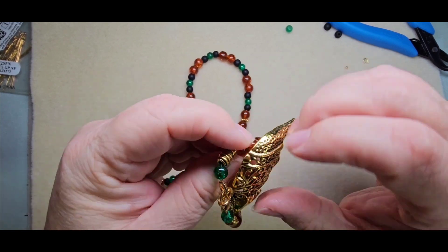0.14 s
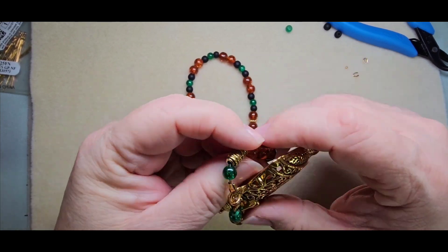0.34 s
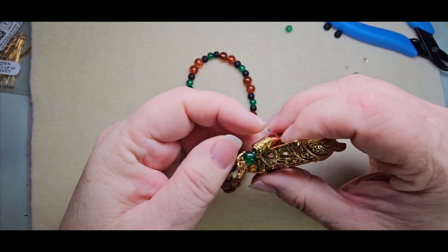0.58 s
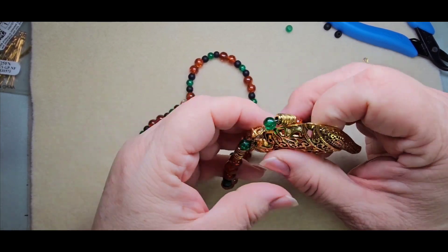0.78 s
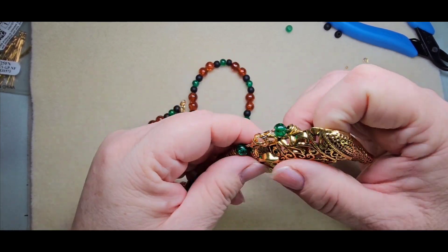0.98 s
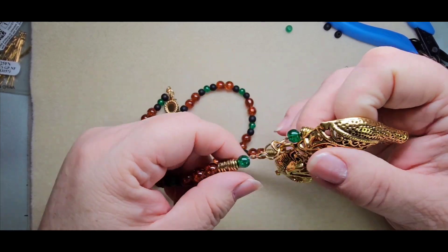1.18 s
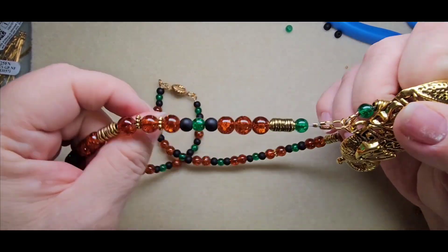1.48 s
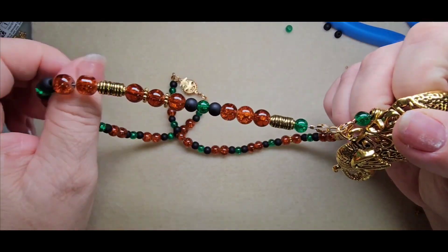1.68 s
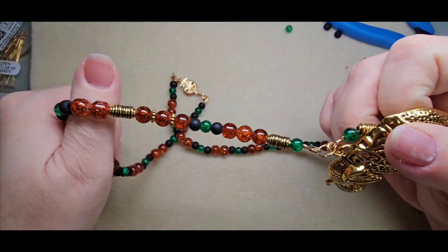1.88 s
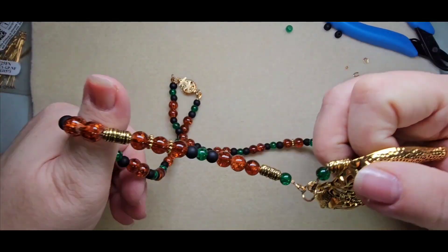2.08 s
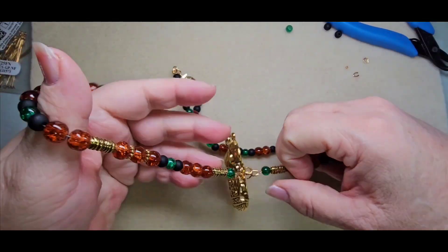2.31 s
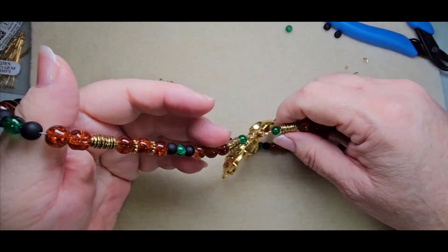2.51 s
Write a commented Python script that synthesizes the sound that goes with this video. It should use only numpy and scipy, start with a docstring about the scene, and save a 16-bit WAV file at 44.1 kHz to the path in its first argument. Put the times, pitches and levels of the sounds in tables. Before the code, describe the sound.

Beaded necklace with a filigree metal pendant clinks and rattles in handling, then drops with a thud

```python
"""Strung necklace handled over a craft table

A filigree metal pendant clinks (noise cracks and decaying modes); short clacks and light ticks, of beads or pendant
(noise bursts, brief random pitches); a small link tinkles (two high modes); at last the pendant drops and the table
thuds (modes). Behind: random faint ticks, one soft rub, a low hum and a thin hiss (shaped noise)."""
import sys
import numpy as np
from scipy import signal
from scipy.fft import rfft, irfft
from scipy.io import wavfile

SR = 44100
rng = np.random.default_rng(int(sys.argv[2]) if len(sys.argv) > 2 else 0)


def store_pcm(level_fs):
    """Save levels as 16-bit WAV."""
    pcm = np.round(np.clip(level_fs, -1, 1) * 32767).astype(np.int16)
    wavfile.write(sys.argv[1], SR, np.atleast_2d(pcm).T)


N = 116865

# room hum spectrum: freq_hz, density_db (relative, per Hz)
HUM_SPECTRUM = [(30, -28.5), (54, -4), (91, -8.5), (124, 4), (161, -10.5), (255, -13.5), (298, -27),
                (360, -28), (420, -13), (490, -24), (516, -19.5), (601, -30), (690, -23), (819, -35),
                (1800, -42.5), (2400, -57.5)]
# hum width: freq_hz, side_over_mid_db
HUM_WIDTH = [(60, -18), (130, -19.5), (250, -4.5), (1400, -1.5)]
# hiss spectrum: freq_hz, density_db (relative, per Hz)
HISS_SPECTRUM = [(1200, 14), (2000, 6), (7000, -2.5), (16500, -7)]
# lowest level of the random faint ticks over time: time_s, lowest_db
RUSTLE_LOWEST = [(0, -72), (.3, -68), (.8, -71.5), (1.26, -76.5), (1.45, -55), (1.8, -76), (1.87, -81.5),
                 (2.15, -72.5), (2.22, -98.5), (2.37, -74), (2.45, -64.5), (2.65, -64)]
# table-top modes: freq_hz, level_db, t60_s
TABLE_MODES = [(101, 0, 0.095), (188.3, 4, 0.091)]
# small link strikes: start_s, level_db
TINKLES = [(2.1403, -36.5), (2.146, -33), (2.1523, -29.5), (2.1695, -44)]
# small link modes: freq_hz, level_db, t60_s
LINK_MODES = [(14780, -16, .02), (15350, -24, .015)]
# short clacks and light ticks, of beads or pendant: start_s, level_db (relative), treble_over_middle_db
CLACKS = [(0.0632, -46, -3), (0.084, -46, 1.5), (0.159, -53.5, 2), (0.202, -45.5, 6), (0.419, -48.5, 0),
          (0.569, -41.5, 8.5), (0.586, -51, 5), (0.6368, -42.5, 6), (0.804, -46, -4), (0.868, -42.5, 7),
          (0.927, -46.5, 0), (1.003, -50.5, -0.5), (1.0217, -51.5, -2), (1.0953, -38.5, 6),
          (1.1406, -34, 9), (1.159, -47.5, -3), (1.198, -41, 2.5), (1.209, -40, -0.5), (1.3046, -35, 5),
          (1.318, -34, 2), (1.3495, -36.5, 3), (1.368, -44, -6.5), (1.3798, -24.5, 6), (1.3843, -22, 18),
          (1.4125, -40, -3), (1.4265, -42.5, 1), (1.47, -40.5, 0), (1.4928, -39.5, -2), (1.501, -40.5, -4),
          (1.5167, -44, 0), (1.5374, -35, 2.5), (1.572, -32, 6), (1.577, -26, 10.5), (1.5892, -29.5, 8.5),
          (1.6173, -31, 7), (1.6262, -34, 4), (1.639, -32, 12), (1.6475, -35, 5), (1.6631, -26.5, 8),
          (1.6814, -30.5, 4), (1.6981, -28, 9.5), (1.7085, -29.5, 8), (1.73, -38, 2), (1.7406, -33, 8),
          (1.752, -37, 2.5), (1.766, -34, 7.5), (1.784, -36, 5.5), (1.8086, -44, 4.5), (1.8295, -50, 4),
          (1.892, -44, 11.5), (1.915, -43, 8.5), (1.9303, -50, 4), (1.9823, -50, 8.5), (2.0553, -39, 10.5),
          (2.1187, -45.5, 11), (2.272, -63, -3), (2.311, -64, 6), (2.434, -43.5, 5), (2.4758, -57.5, -3.5),
          (2.561, -27, 18), (2.5715, -32, 9), (2.5837, -32.5, 9), (2.594, -31.5, 11), (2.61, -36, 22)]
# clack noise bands, middle then treble: low_hz, high_hz
CLACK_BANDS = [(3000, 9640), (10500, 20000)]
# pendant knocks: start_s, low_db, middle_db, high_db, ring_over_crack_db (relative)
KNOCKS = [(0.1103, -35, -29.5, -35, -2.5), (0.2291, -38.5, -34, -41, 2), (0.2499, -34, -34, -35.5, 2),
          (0.2621, -36.5, -44, -41, -1), (0.2924, -25, -29, -30.5, 4.5), (0.305, -33.5, -36, -35, -1.5),
          (0.3358, -34.5, -35, -36, -10), (0.3562, -28.5, -31.5, -34, 3), (0.429, -36.5, -39, -37.5, 0),
          (0.4347, -40, -46, -48, -2), (0.4648, -26.5, -36, -32.5, 5), (0.5776, -40, -34, -48, -1.5),
          (0.6542, -41, -38.5, -41, -2.5), (0.728, -27.5, -26.5, -20.5, -10.5),
          (0.7698, -27, -33.5, -27, -5.5), (0.779, -39, -48, -32, -9), (0.82, -30, -28.5, -19, -5),
          (0.8563, -39, -43, -57, -5.5), (1.0501, -32.5, -29, -28.5, -2.5),
          (2.3821, -41.5, -46.5, -38.5, -1), (2.4005, -39.5, -48, -33, 0.5), (2.407, -38, -47, -32, 1),
          (2.426, -48.5, -44, -46.5, 0), (2.5273, -25.5, -25.5, -17, -6)]
# pendant modes in low, middle, high groups: freq_hz, held_db (relative), base_t60_s, dropped_db (relative)
PENDANT_MODES = [
    [(4250, -14, .04, -14), (4730, -14, .04, -18), (5290, 2, .05, -20), (5490, -10, .04, -18),
     (6735, -4, .055, -13)],
    [(8330, 0, .04, -26), (8640, -6, .04, -22), (10245, -8, .04, -10)],
    [(11555, 0, .045, 0), (11850, -8, .04, -10), (14130, -1, .035, -22), (14500, -13, .035, -16),
     (15600, -10, .03, -17)],
]
# crack noise band of each pendant group: low_hz, high_hz
PENDANT_BANDS = [(4200, 7400), (7400, 10800), (10800, 16500)]
# left minus right of each pendant group: pan_db
PENDANT_PAN_DB = [3.5, 6, 4]

HUM_RMS_DB, HISS_RMS_DB = -52, -81.5
PAN_DB = 3  # left minus right, for clacks, link and rustle
LAG_S, ALIKE = 0.000251, 0.21  # right port: delay and share of the left port's noise
RING_PHASE_RAD = 1.395  # between ports
ROLL_HZ, TOP_HZ = 15900, 16990
# contact outline
RISE_S, KNOCK_T60_S, CLACK_T60_S = 0.0013, 0.0074, 0.0069
TAIL_T60_S, TAIL_DB = 0.14, -16.5  # faint tail of table and room
LEAD_IN_MEAN_S, LEAD_IN_DB = 0.004, -23.5
BOUNCE_MEAN_S, BOUNCE_MAX_DB = 0.0054, -4.5
# background handling
TICKS_PER_S, TICK_MEAN_EXCESS_DB = 260, 2.5
RUB_S, RUB_SIGMA_S, RUB_HZ, RUB_PEAK_RMS_DB = 1.787, 0.065, 1690, -72.5
THUD_S, THUD_DB = 2.526, -34
# clacks
CLACKS_DB, CLACK_TREBLE_DB, CLACK_TREBLE_PAN_DB = -7.5, 0.5, 2
SNAP_DB = 1.5  # hard first tick
CLACK_RING_DB, CLACK_RING_T60_S = -17.5, 0.012
# pendant
RING_DB, CRACK_DB, MODE_SCATTER_DB = -12, -10, 3.5
CHATTER_GAIN = 0.17741
JINGLE_DB = -25  # loose parts: faint tail of the chatter
HELD_T60_RATIO, FREE_T60_RATIO, LINGER_DB = 0.38, 1.43, -19
BODY_DB, BODY_LOW_HZ, THIN_HZ = -25.5, 1670, 3680
DROP_DB, DROP_RATTLE_T60_S = -43.5, 0.028


def undb(db):
    """dB to amplitude."""
    return 10 ** (np.asarray(db, float) / 20)


def pan(db):
    """Gains of the left and right ports, left minus right in dB."""
    return undb([[db / 2], [-db / 2]])


def strikes(times_s, db):
    """Impulses of the given levels."""
    x = np.zeros(N)
    index = (np.asarray(times_s) * SR).astype(int)
    np.add.at(x, np.clip(index, 0, N - 1), undb(db))
    return x


def cluster(times_s, db, chance):
    """A contact is a faint lead-in, a blow and a rebound."""
    lead_in = strikes(times_s - LEAD_IN_MEAN_S * (.5 + chance[:, 0]), db + LEAD_IN_DB)
    blow = strikes(times_s, db)
    rebound = strikes(times_s + BOUNCE_MEAN_S * (.5 + chance[:, 1]), db + BOUNCE_MAX_DB - 5 * chance[:, 2])
    return lead_in + blow + rebound


def fade(x, t60_s):
    """Exponential decay after each impulse."""
    return signal.lfilter([1], [1, -np.exp(-np.log(1000) / (t60_s * SR))], x)


def burst(x, t60_s, tail_db=TAIL_DB):
    """Amplitude outline of contacts: rounded swell and fall, faint tail; powers add."""
    power_in = x ** 2
    swell = fade(fade(power_in, t60_s / 2), t60_s / 2) * 37.6 / (t60_s * SR)  # peak 1 per unit strike
    tail = undb(2 * tail_db) * fade(power_in, TAIL_T60_S / 2)
    k = np.exp(-1 / (RISE_S * SR))
    smooth = signal.lfilter([1 - k], [1, -k], swell + tail)
    return np.sqrt(np.maximum(smooth, 0))


def band(x, low_hz, high_hz, order=3):
    """Butterworth band-pass."""
    return signal.sosfilt(signal.butter(order, [low_hz, high_hz], "band", fs=SR, output="sos"), x)


def pair(low_hz, high_hz, order=3):
    """Band noise of rms 1 at two ports; the right shares a delayed part of the left."""
    left, other = rng.standard_normal((2, N))
    right = ALIKE * np.roll(left, int(LAG_S * SR)) + np.sqrt(1 - ALIKE ** 2) * other
    x = band(np.array([left, right]), low_hz, high_hz, order)
    return x / x.std()


def ring(x, hz, db, t60_s):
    """One decaying mode as a complex resonator; the ports hear it out of phase."""
    pole = np.exp((2j * np.pi * hz - np.log(1000) / t60_s) / SR)
    z = signal.lfilter([1], [1, -pole], x)
    return undb(db) * np.array([z.imag, (z * np.exp(-1j * RING_PHASE_RAD)).imag])


def coloured(spectrum):
    """Steady noise shaped to a spectrum, interpolated over log frequency."""
    freq = np.maximum(np.fft.rfftfreq(N, 1 / SR), 1)
    hz, db = np.array(spectrum).T
    shape_db = np.interp(np.log(freq), np.log(hz), db, left=-90, right=-90)
    return irfft(rfft(rng.standard_normal(N)) * undb(shape_db), N)


def room():
    """Low hum, alike at both ports in the bass, plus independent thin hiss."""
    mid = coloured(HUM_SPECTRUM)
    hz, db = np.array(HUM_SPECTRUM).T
    width_hz, width_db = np.array(HUM_WIDTH).T
    side_db = db + np.interp(np.log(hz), np.log(width_hz), width_db)
    side = coloured(np.c_[hz, side_db])
    hum = undb(HUM_RMS_DB) / mid.std() * np.array([mid + side, mid - side])
    hiss = np.array([coloured(HISS_SPECTRUM), coloured(HISS_SPECTRUM)])
    return hum + undb(HISS_RMS_DB) * hiss / hiss.std()


def rub():
    """Soft friction: narrow noise under a bell-shaped swell."""
    x = band(rng.standard_normal(N), .9 * RUB_HZ, 1.13 * RUB_HZ, order=2)
    swell = np.exp(-.5 * ((np.arange(N) / SR - RUB_S) / RUB_SIGMA_S) ** 2)
    return undb(RUB_PEAK_RMS_DB) * swell * x / x.std()


def rustle():
    """Random faint ticks at a constant mean rate; exponential excess over a moving lowest level."""
    chance = rng.random((1500, 2))
    t = np.cumsum(-np.log(1 - chance[:, 0])) / TICKS_PER_S
    lowest_db = np.interp(t, *np.array(RUSTLE_LOWEST).T)
    db = lowest_db - TICK_MEAN_EXCESS_DB * np.log(1 - chance[:, 1])
    inside = t < N / SR
    return burst(strikes(t[inside], db[inside]), 0.017) * pair(3200, ROLL_HZ, order=2)


def thud():
    """The landing pushes softly on the table top, whose low modes answer."""
    push = band(strikes([THUD_S], [THUD_DB]), 48, 226, order=1)
    return sum(ring(push, *mode)[0] for mode in TABLE_MODES)  # same at both ports


def link():
    """Small link: short high modes driven by strikes and scratchy noise."""
    start_s, db = np.array(TINKLES).T
    hits = strikes(start_s, db)
    scratch = 0.33 * burst(hits, 0.0078, tail_db=-34) * band(rng.standard_normal(N), 6400, ROLL_HZ)
    return sum(ring(hits + scratch, *mode) for mode in LINK_MODES) * pan(12)


def clacks():
    """Dry contacts: hard tick, broad clack, brief random pitch."""
    start_s, db, bright_db = np.array(CLACKS).T
    chance, out = rng.random((len(start_s), 4)), 0
    middle_db, treble_db = db - bright_db, db + CLACK_TREBLE_DB
    for level_db, edges, lean_db in zip((middle_db, treble_db), CLACK_BANDS, (0, CLACK_TREBLE_PAN_DB)):
        hits = cluster(start_s, level_db, chance)
        snap = undb(SNAP_DB) * fade(hits, 0.0013)
        clack = burst(hits, CLACK_T60_S)
        out = out + (clack + snap) * pair(*edges, order=2) * pan(lean_db)
    low_hz, high_hz = CLACK_BANDS[0]
    noise = rng.standard_normal(N)
    for s, level_db, pick in zip(start_s, middle_db, chance[:, 3]):
        push = burst(strikes([s], [level_db]), CLACK_T60_S) * noise
        pitch_hz = low_hz * (high_hz / low_hz) ** pick
        out = out + ring(push, pitch_hz, CLACK_RING_DB, CLACK_RING_T60_S)
    return undb(CLACKS_DB) * out


def drop():
    """Pendant falls free: a tap and a longer noise rattle drive every mode, ringing longer."""
    hit = strikes([THUD_S - .0015], [DROP_DB])
    rattle = burst(hit, DROP_RATTLE_T60_S, tail_db=-60) * rng.standard_normal(N)
    push = 4 * hit + rattle
    return sum(ring(push, hz, dropped_db, t60_s * FREE_T60_RATIO)
               for modes in PENDANT_MODES for hz, _, t60_s, dropped_db in modes)


def pendant():
    """Filigree metal: each knock cracks, chatters and excites finger-damped modes unevenly."""
    start_s, low_db, middle_db, high_db, ring_over_crack_db = np.array(KNOCKS).T
    chance, out = rng.random((len(start_s), 3)), 0
    groups = zip(PENDANT_MODES, PENDANT_BANDS, PENDANT_PAN_DB, (low_db, middle_db, high_db))
    for modes, edges, pan_db, level_db in groups:
        hits = cluster(start_s, level_db, chance)
        part = undb(CRACK_DB) * burst(hits, KNOCK_T60_S) * pair(*edges)
        for hz, held_db, t60_s, _ in modes:
            uneven_db = MODE_SCATTER_DB * rng.standard_normal(len(start_s))
            push = cluster(start_s, level_db + ring_over_crack_db + uneven_db, chance)
            shape = burst(push, KNOCK_T60_S, tail_db=JINGLE_DB)
            push = push + CHATTER_GAIN * shape * rng.standard_normal(N)
            held = ring(push, hz, held_db + RING_DB, HELD_T60_RATIO * t60_s)
            linger = ring(push, hz, held_db + RING_DB + LINGER_DB, FREE_T60_RATIO * t60_s)
            part = part + held + linger
        out = out + part * pan(pan_db)
    thinned = signal.sosfilt(signal.butter(3, THIN_HZ, "high", fs=SR, output="sos"), out)
    # duller noise under each knock
    body_shape = burst(cluster(start_s, low_db, chance), KNOCK_T60_S)
    body = undb(BODY_DB) * body_shape * pair(BODY_LOW_HZ, PENDANT_BANDS[0][0], order=2)
    return thinned + body


def scene():
    """Room, handling noises, clacks and pendant, summed in stereo."""
    handling = (rustle() + link() + clacks()) * pan(PAN_DB)
    return room() + rub() + thud() + handling + drop() + pendant()


def record(dry):
    """Stereo phone: treble roll-off, then a steep cut above."""
    soft = signal.sosfilt(signal.cheby2(12, 32, ROLL_HZ + 150, fs=SR, output="sos"), dry)
    return signal.sosfilt(signal.ellip(8, .2, 60, TOP_HZ, fs=SR, output="sos"), soft)


dry = scene()
out = record(dry)
store_pcm(out)
```